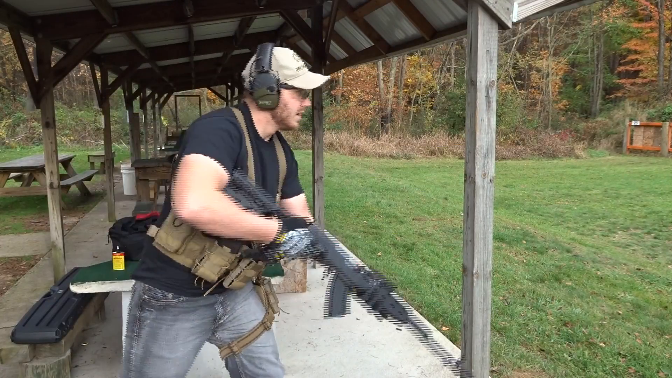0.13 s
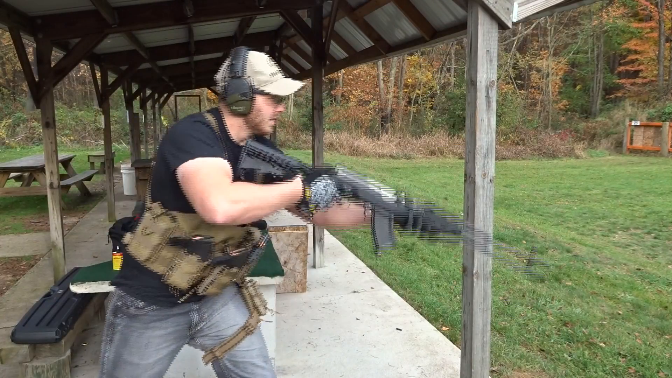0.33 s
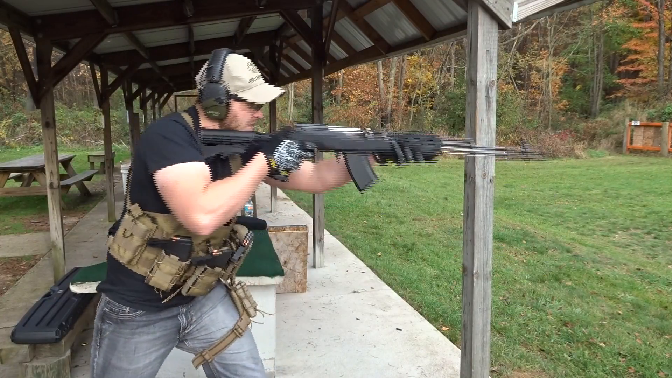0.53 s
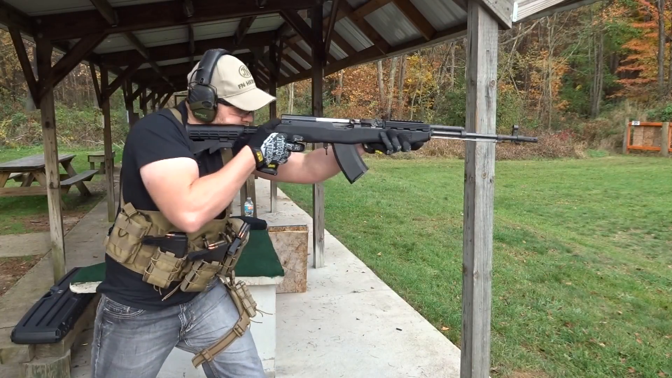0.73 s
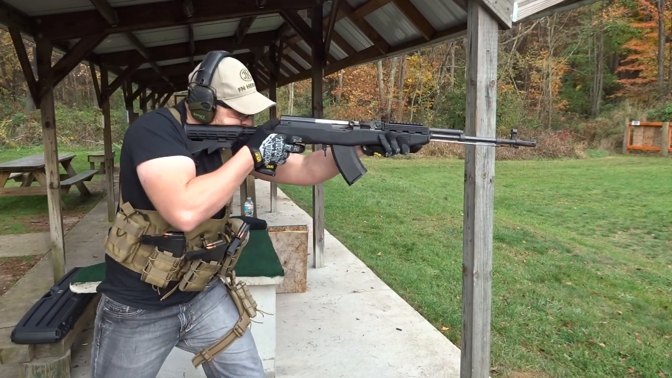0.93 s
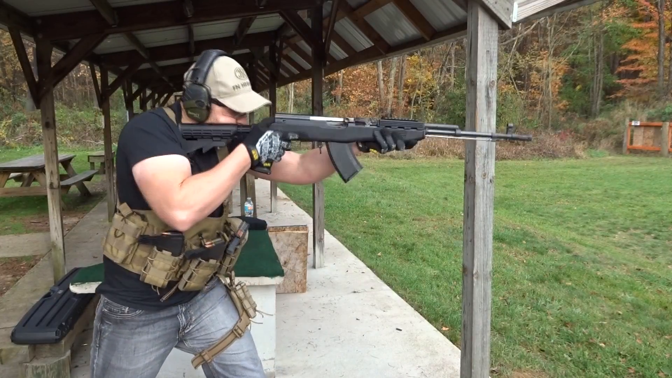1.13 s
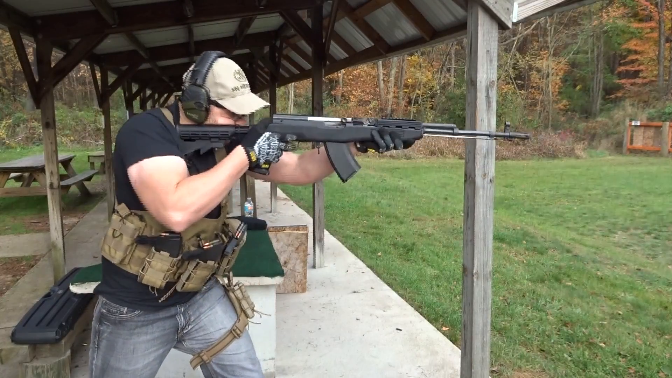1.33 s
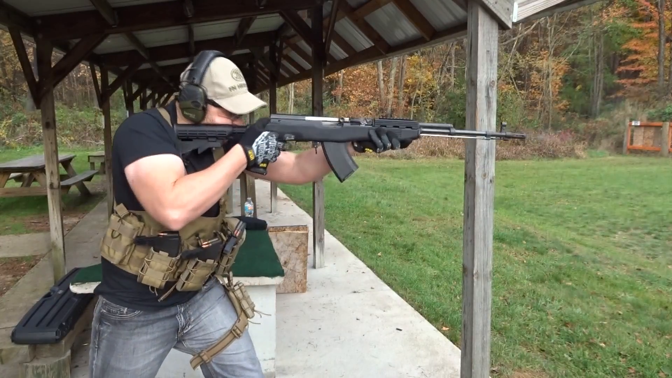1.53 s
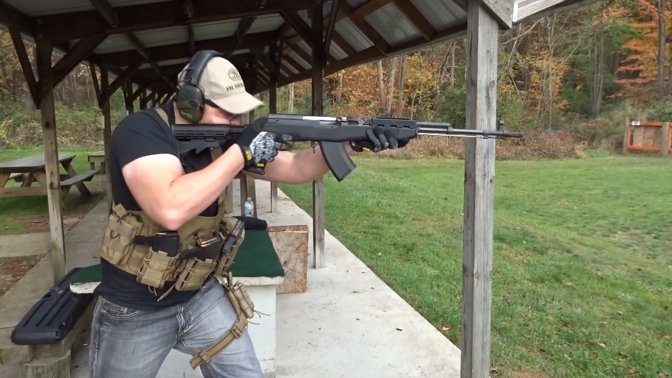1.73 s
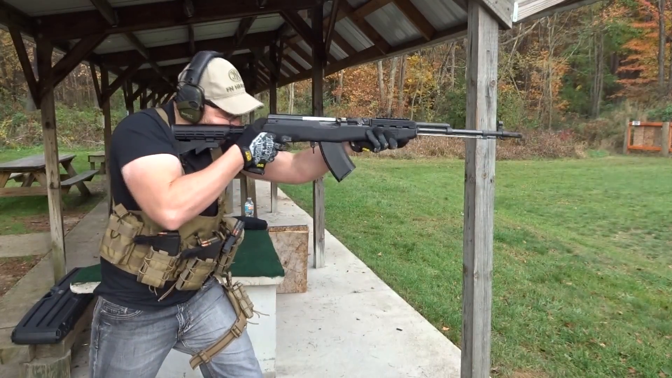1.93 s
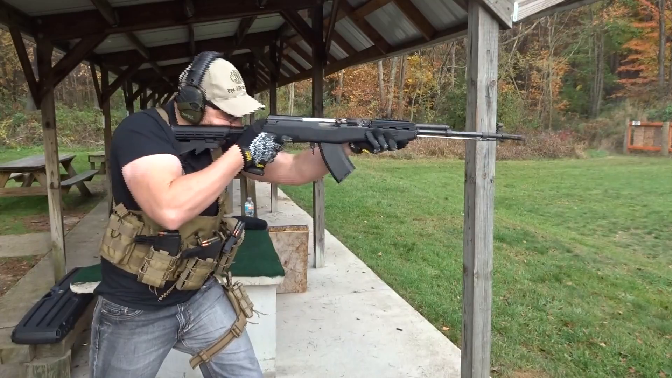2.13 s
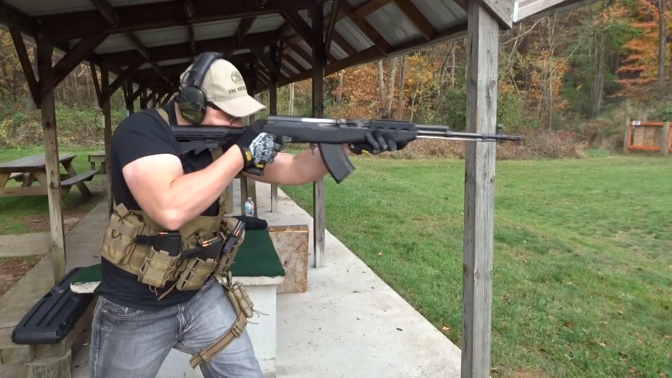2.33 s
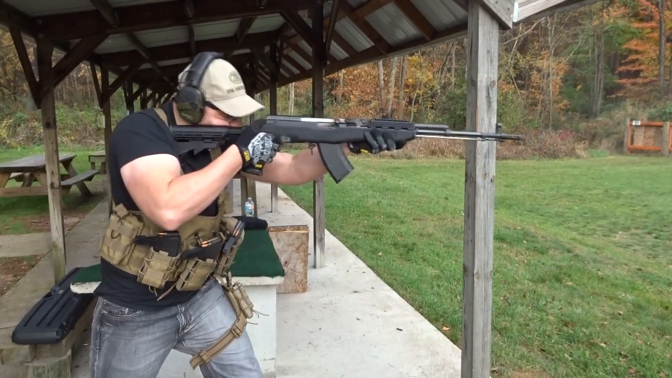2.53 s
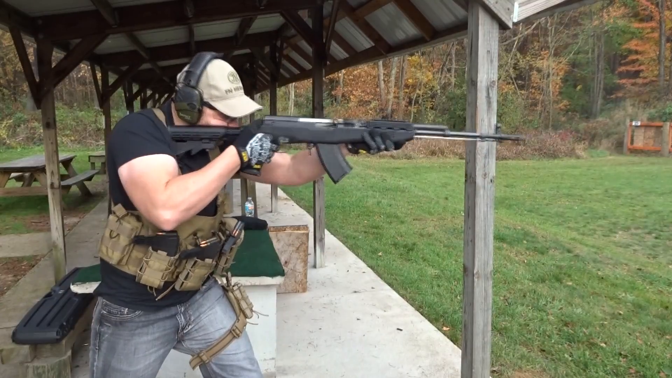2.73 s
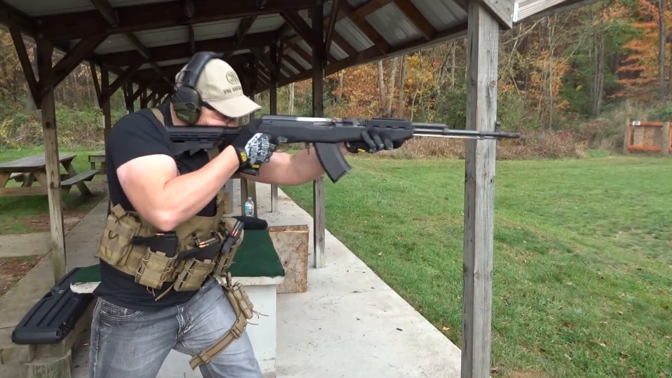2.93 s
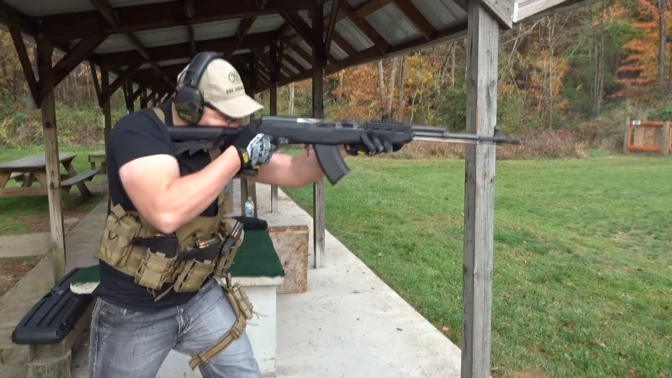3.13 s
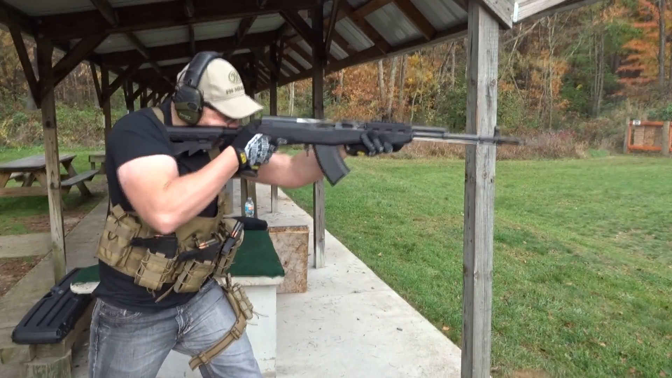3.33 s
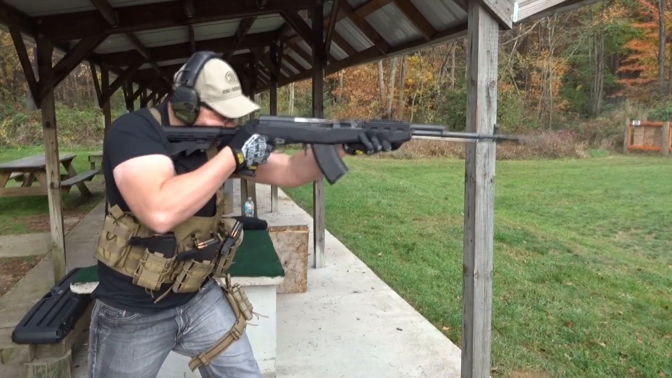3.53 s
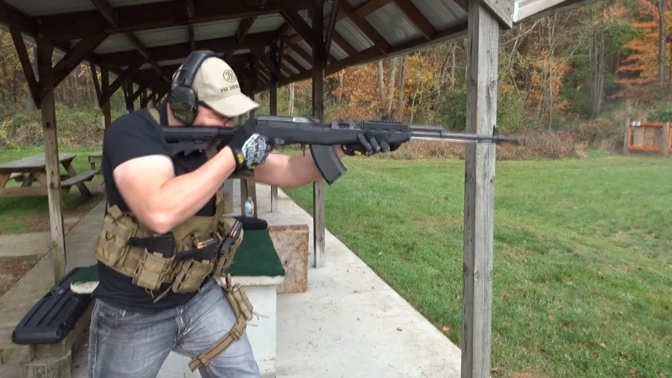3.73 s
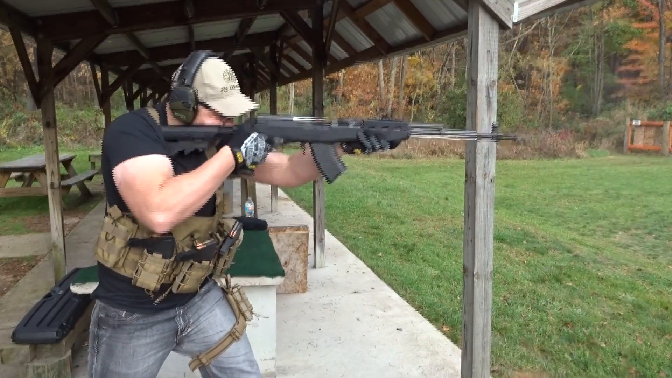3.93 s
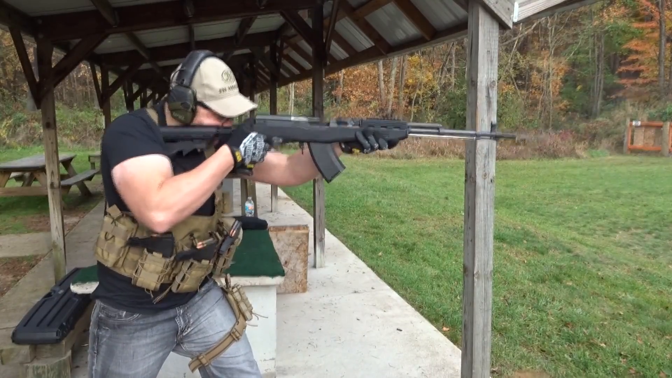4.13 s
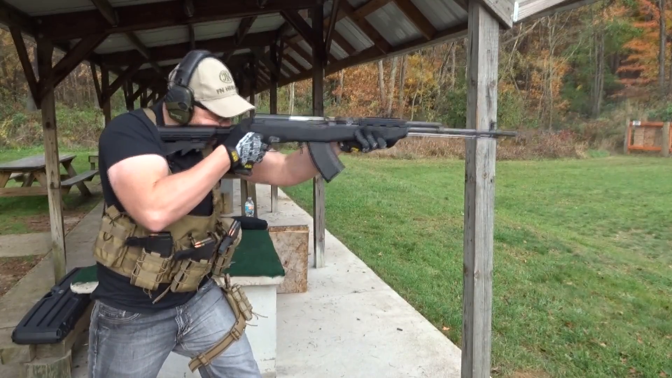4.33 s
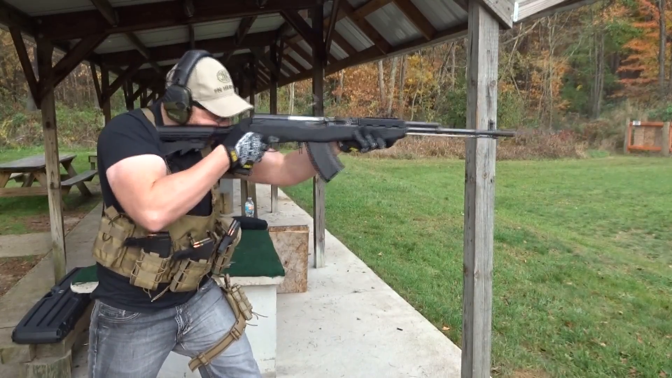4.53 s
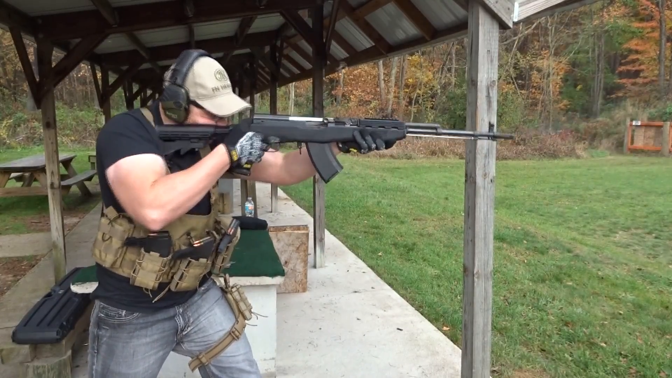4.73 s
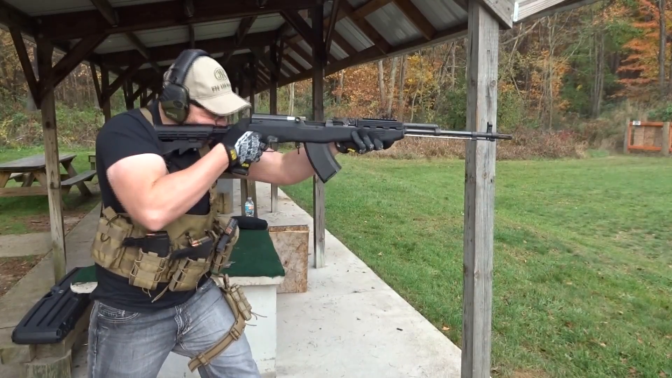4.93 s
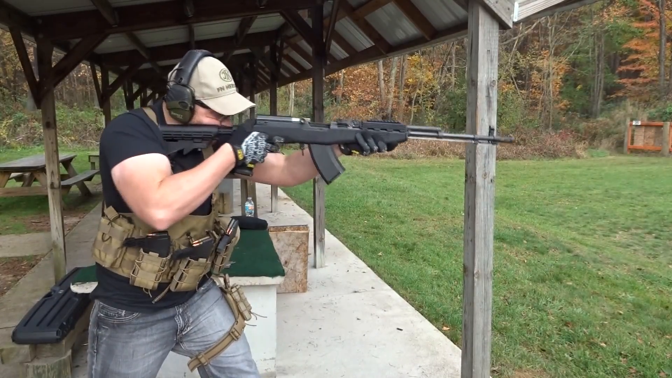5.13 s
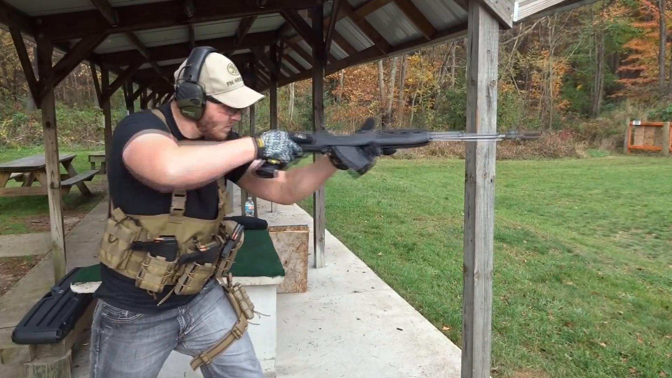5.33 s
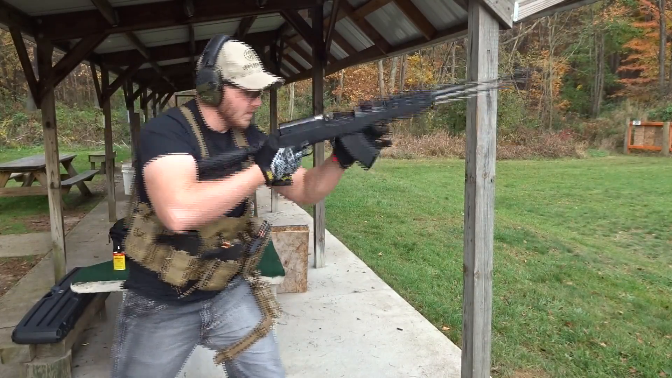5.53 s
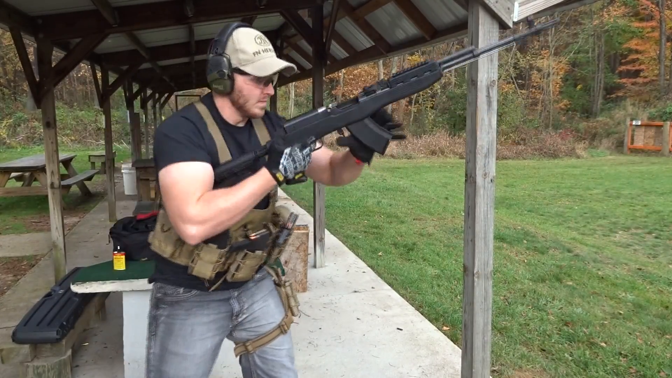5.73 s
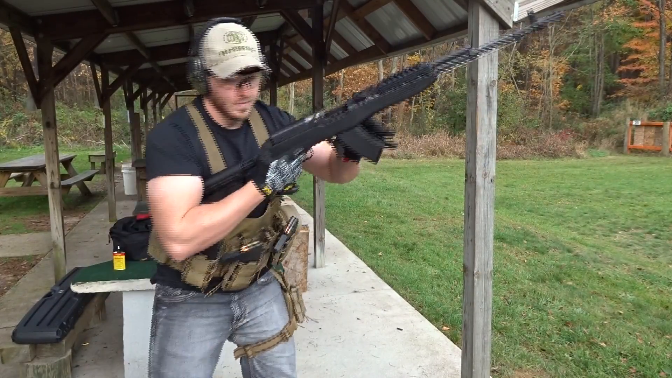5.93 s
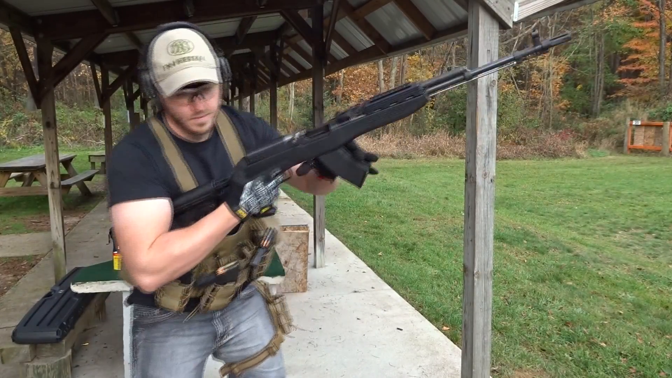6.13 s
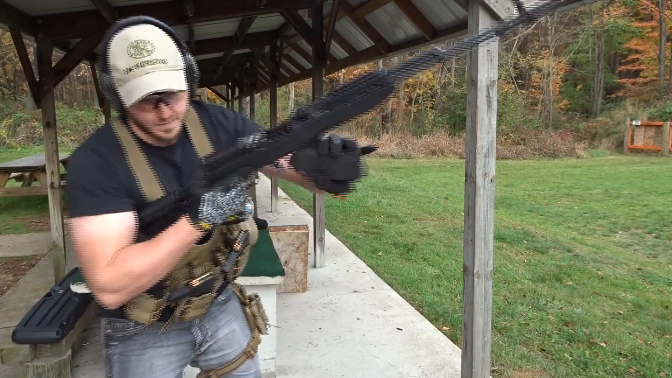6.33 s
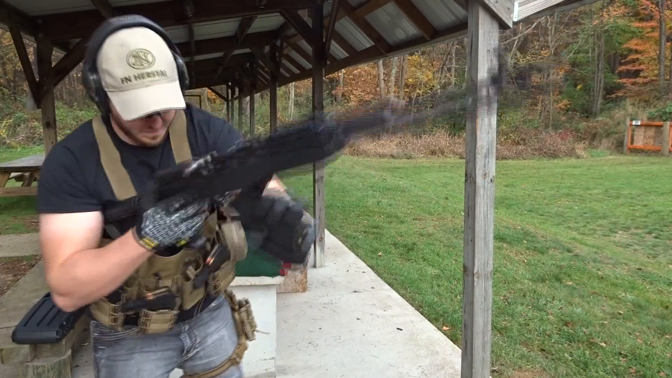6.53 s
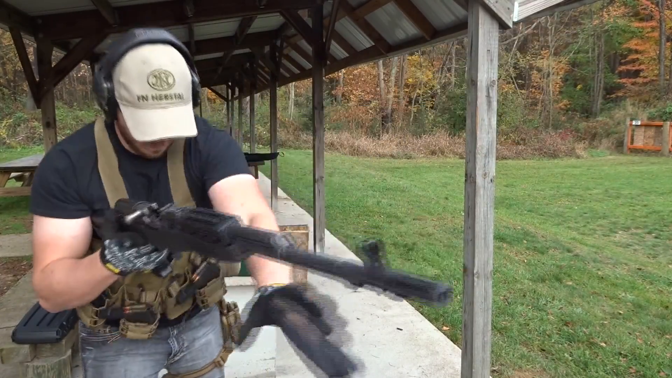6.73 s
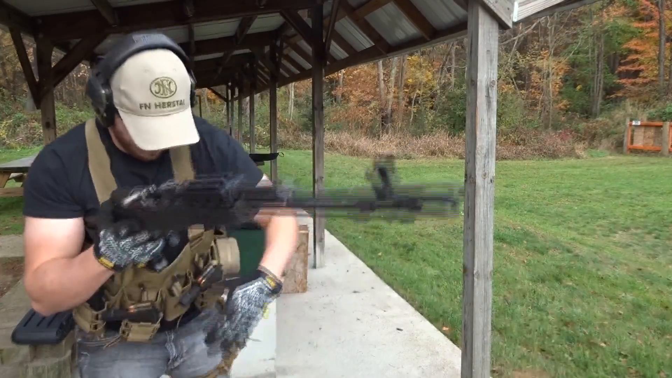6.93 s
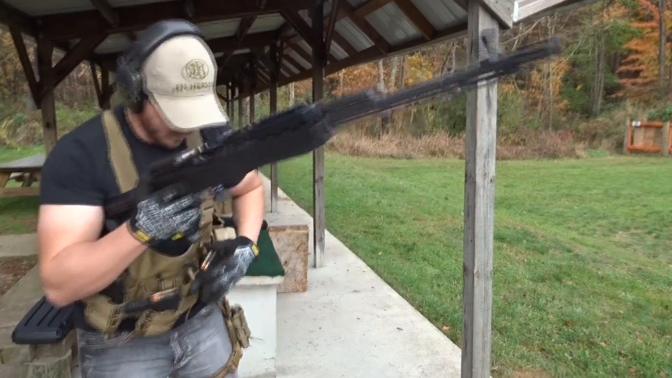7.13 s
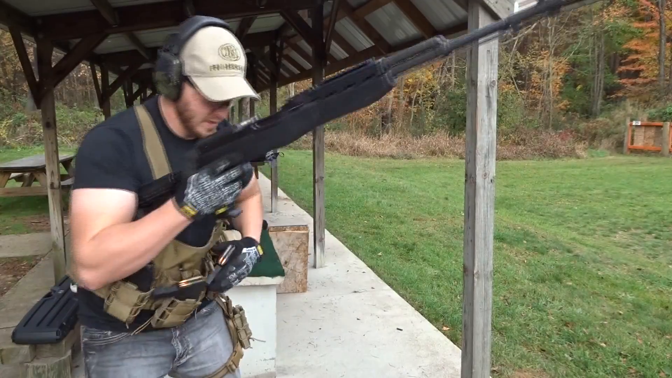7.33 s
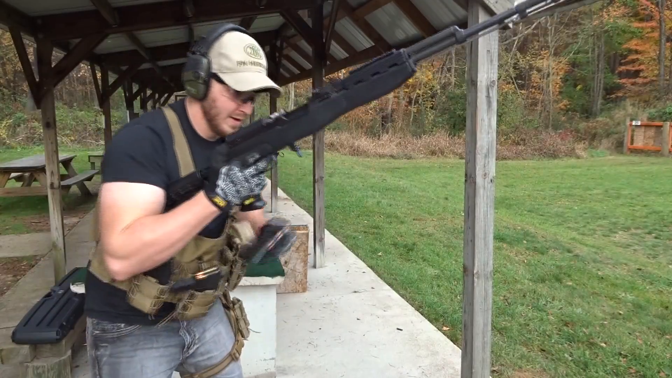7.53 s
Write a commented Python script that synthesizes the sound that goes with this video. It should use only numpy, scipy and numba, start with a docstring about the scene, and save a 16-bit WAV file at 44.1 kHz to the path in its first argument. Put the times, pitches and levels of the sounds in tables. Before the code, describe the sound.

Twenty quick rifle shots crack and boom under an open shelter, echoes roll off through woods and valley, then a magazine knocks out with metallic rattles.

```python
"""Under a long open shelter with a sheet roof, a rifle fires twenty quick shots; woods and a far valley answer.
Shots and echoes are shaped noise, with sine notes for the roof. Before them, sling and safety click in light wind;
after them, empty cases tinkle and the magazine knocks out of its well: noise puffs, thuds and fading sines.
The blasts overload the microphone and drive its automatic gain down; the slow part of the gain never climbs back."""
import sys
import numpy as np
from scipy import signal
from scipy.fft import rfft, irfft, next_fast_len
from scipy.io import wavfile
from scipy.ndimage import uniform_filter1d
from numba import njit

SR = 44100
rng = np.random.default_rng(int(sys.argv[2]) if len(sys.argv) > 2 else 0)


def amplitude_ratio(level_db):
    """Convert a level in decibels to the matching linear amplitude (field) ratio."""
    exponent = np.asarray(level_db, float) / 20
    return 10 ** exponent


def bounce(signal):
    """Save signal as a 16-bit WAV file at the path given by the first command-line argument."""
    frames = np.transpose(np.atleast_2d(signal))
    limited = np.clip(frames, -1, 1)
    pcm = np.round(limited * 32767).astype(np.int16)
    wavfile.write(sys.argv[1], SR, pcm)


N = 339129  # length in samples


def unit(x):
    """Scale a sound to rms 1."""
    return x / np.sqrt(np.mean(x ** 2) + 1e-20)


def along(points, hz):
    """Read rows of (Hz, value, ..) at the frequencies hz, joining them with lines on a log axis."""
    f, *columns = np.transpose(points)
    return np.squeeze([np.interp(np.log(hz + 1), np.log(f + 1), column) for column in columns])


def stereo(z, hz, alike):
    """Blend two unrelated spectrograms into left and right with the given likeness."""
    angle = np.arccos(np.clip(along(alike, hz), -1, 1))[:, None] / 2
    mid = z[0] * np.cos(angle)
    side = z[1] * np.sin(angle)
    return signal.istft(np.array([mid + side, mid - side]), nperseg=2 * len(hz) - 2)[1]


def patches(shape, db):
    """Random gain in soft patches over frequency and time, straying by db."""
    field = uniform_filter1d(rng.standard_normal(shape), size=8, axis=0)
    field = uniform_filter1d(field, size=6, axis=1)
    return amplitude_ratio(db * unit(field))


def band_noise(size, hz, octaves):
    """Noise of rms 1, strongest around hz and weaker away from it."""
    f = np.fft.rfftfreq(size, 1 / SR) + 1
    hump = 1 / (1 + (np.log2(f / hz) / octaves) ** 2) ** 1.25
    return unit(irfft(rfft(rng.standard_normal(size)) * hump, size))


def add(track, s, sound):
    """Mix a sound into the track from second s."""
    start = round(s * SR)
    track[..., max(start, 0):start + sound.shape[-1]] += sound[..., max(-start, 0):]


# Firing times, in seconds. The echoes below start from them too.
SHOT_TIMES = [(0.9149), (1.1455), (1.345), (1.54), (1.7377), (1.9506), (2.1603), (2.3583), (2.5612),
              (2.7606), (2.987), (3.1862), (3.3783), (3.5923), (3.788), (3.9911), (4.1742), (4.3666),
              (4.5449), (4.7329)]
# Tone of the blast. Each row: frequency in Hz, relative level in dB.
BLAST_TONE = [(40, -17.5), (100, -1.5), (200, 0), (600, 4.5), (900, 0.5), (1300, -4), (3000, -8.5),
              (7000, -16), (13000, -19.5), (16500, -23)]
# Notes of the shelter. Each row: frequency in Hz, relative level in dB.
ROOF_NOTES = [(161.5, -23.5), (220.7, -20.5), (285.3, -20), (511.4, -16.5), (554.5, -35), (656.8, -28),
              (709, -29), (802.1, -19), (1416, -31.5), (1750, -31), (1949, -24.5), (2169, -25.5),
              (2358, -32.5), (2536, -31)]
# How the shelter answers. Each row: frequency in Hz, seconds to fade by 60 dB (on top of a fade shared by all),
# build-up time in seconds, share of the power that repeats from shot to shot (0 to 1).
SHELTER_ECHO = [(100, 0.9, 0.004, 0.98), (370.5, 0.42, 0.0095, 0.3), (700, 0.35, 0.0078, .8),
                (1580, 0.48, 0.0012, 0.2), (3050, 0.18, 0.0029, 0.4), (6000, 0.48, 0.0022, 0.2),
                (12000, 0.29, 0.0015, 0.04)]
# Likeness of left and right in all the echoes. Each row: frequency in Hz, likeness (1 is the same).
ECHO_LIKENESS = [(60, 0.99), (150, 1), (380, 1), (950, 0.91), (2380, 0.91), (5000, 0.82), (9000, 0.8),
                 (15000, 0.85)]


def shelter():
    """Blast under the roof: treble crack first, low boom builds up; low echoes repeat, treble is mostly new."""
    size = SR // 2
    out = np.zeros((2, N + SR))

    def noise_spectrogram():
        return signal.stft(rng.standard_normal((2, size)), SR, nperseg=128)

    hz, t, same = noise_spectrogram()
    t60, build_up, share = along(SHELTER_ECHO, hz)[:, :, None]
    late = np.clip(t - .055, 0, None)  # posts and rafters down the long roof keep answering at first
    shape = amplitude_ratio(-60 * late / t60 - 171 * t) * (1 - np.exp(-t / build_up)) ** 2
    tone = amplitude_ratio(along(BLAST_TONE, np.fft.rfftfreq(2 * size, 1 / SR)))
    age = np.clip(np.arange(size) / SR - .004, 0, None)  # the roof answers a little after the crack
    swell = amplitude_ratio(-60 * age / .22) * (1 - np.exp(-age / .004))
    # each note reaches one side a little earlier
    lean = 0.14 * rng.standard_normal((len(ROOF_NOTES), 1, 1)) * [[1], [-1]]
    for s in SHOT_TIMES:
        fresh = noise_spectrogram()[2]
        mixed = np.sqrt(share) * same + np.sqrt(1 - share) * fresh
        echoes = stereo(shape * mixed, hz, ECHO_LIKENESS)
        blast = irfft(rfft(echoes, 2 * size) * tone)[:, :size]
        blast[:, 0] = 0
        boom = 0
        for k, (f, db) in enumerate(ROOF_NOTES):
            level = (-1) ** k * amplitude_ratio(db + rng.normal(0, 2.1))  # every other note starts upside down
            boom = boom + level * np.sin(2 * np.pi * f * age + lean[k])
        add(out, s - .001, blast + swell * boom)
    return out[:, :N]


# Echo of the tree line. Each row: frequency in Hz, relative level in dB, seconds to fade by 60 dB.
WOODS_ECHO = [(49.7, -33, 2.3), (125.3, -3.5, 1.5), (288.4, 0.5, 1.23), (610, 2.5, 1.94), (1400, -6, 1.64),
              (2950, -6, 1.18), (6000, -13, 0.94), (9000, -13, 0.6), (12500, -21, 0.69),
              (16000, -27.5, 0.62)]
# Echo of the far valley. Each row: frequency in Hz, relative level in dB, seconds to fade by 60 dB.
VALLEY_ECHO = [(100, -45, 4), (250, -26, 2.2), (447, 1, 8), (650, 1, 9), (870, -4, 7), (1170, -22, 5.4),
               (1700, -26.5, 6.4), (3000, -34, 3.4), (6000, -56.5, 2)]


def far_echo(answer, rise):
    """Every shot adds noise power that swells for about rise seconds, then fades at its own speed per frequency."""
    hz, t, z = signal.stft(rng.standard_normal((2, N)), SR, nperseg=512)
    db, t60 = along(answer, hz)[:, :, None]
    power = 0
    for s in SHOT_TIMES:
        age = np.clip(t - s, 0, None)
        power = power + amplitude_ratio(-120 * age / t60) * (1 - np.exp(-age / rise)) ** 2
    echo = z * amplitude_ratio(db) * np.sqrt(power) * patches(power.shape, db=1.18)
    return stereo(echo, hz, ECHO_LIKENESS)[:, :N]


def click(db, hz):
    """A sharp metal contact: a bright noise puff with a quick snap, and a narrow ring."""
    t = np.arange(SR // 10) / SR
    fade = amplitude_ratio(-60 * t / .028) + 0.75 * amplitude_ratio(-60 * t / 0.004)  # body, then snap
    puff = fade * band_noise(len(t), hz, octaves=1.0)
    ring = 0.39 * amplitude_ratio(-60 * t / .04) * band_noise(len(t), hz, octaves=.06)
    return amplitude_ratio(db) * (puff + ring)


# Single small contacts: sling and safety, trigger and hammer, empty cases landing, then late clicks.
# Each row: start in seconds, level in dB, strongest frequency in Hz.
CLICK_ROWS = [(0.3934, -74.5, 3650), (0.469, -82, 5000), (0.5074, -85, 7500), (.631, -94, 5630),
              (0.87, -81, 4940), (.8789, -87, 9000), (0.8938, -77, 6000), (.9084, -57, 6860),
              (5.198, -54, 11500), (5.323, -68, 12000), (5.42, -70, 12000), (5.555, -74, 12500),
              (5.5997, -68, 9000), (5.6765, -69, 8500), (6.13, -79, 5000), (6.1564, -68, 7000),
              (6.4273, -70, 3600), (6.479, -64, 1900), (6.765, -39, 6000), (6.7925, -41.5, 6000),
              (6.9716, -74, 3770), (7.0175, -52, 7000), (7.4076, -58.5, 7200), (7.4265, -53.5, 11590),
              (7.437, -55, 9000), (7.578, -59, 7700)]
# Blows that leave loose parts rattling. Each row: start in seconds, level of the blow in dB,
# strongest frequency of the blow in Hz, seconds for the rattle to fade by 60 dB.
RATTLE_ROWS = [(6.1942, -47.5, 4500, 0.27), (6.7541, -50, 4000, 0.59), (6.8384, -58, 5500, .45),
               (7.0028, -46, 2470, .22), (7.5542, -49.5, 4000, .14)]
# Small steel parts and empty cases ringing on one note.
# Each row: start in seconds, level in dB, frequency in Hz, seconds to fade by 60 dB.
PING_ROWS = [(.3925, -70, 3570, .03), (1.203, -14, 12440, 0.099), (2.82, -22, 12600, 0.12),
             (5.555, -70, 12400, .12), (6.756, -50, 2350, 0.11), (6.79, -36.5, 1580, 0.045),
             (7.02, -56, 3500, .06)]


def metal():
    """Contacts are noise clicks; blows leave uneven fading ticks over a noise scrape; pings are fading sines."""
    out = np.zeros(N + SR)
    t = np.arange(SR // 4) / SR
    for s, db, hz in CLICK_ROWS:
        add(out, s, click(db, hz))
    for s, db, hz, t60 in RATTLE_ROWS:
        add(out, s, click(db, hz))
        scrape = amplitude_ratio(db - 15 - 60 * t / t60) * band_noise(len(t), hz, octaves=1.5)
        add(out, s, scrape)
        chance = rng.standard_normal((8, 3))  # eight ticks: gap, strength and pitch
        delays = np.cumsum(.016 * np.exp(.15 * chance[:, 0]))  # seconds after the blow
        for late, (_, strength, pitch) in zip(delays, chance):
            tick_db = db - 4 + 2.5 * strength - 60 * late / t60
            tick_hz = min(1.3 * hz * np.exp(.3 * pitch), 13000)
            add(out, s + late, click(tick_db, tick_hz))
    for s, db, hz, t60 in PING_ROWS:
        onset = 1 - np.exp(-t / 0.00082)
        add(out, s, amplitude_ratio(db - 60 * t / t60) * np.sin(2 * np.pi * hz * t) * onset)
    return out[:N]


# Magazine knocking on the stock.
# Each row: start in seconds, level in dB, starting frequency of the thud in Hz, seconds for the thud to fade by 60 dB.
KNOCK_ROWS = [(6.7536, -20.5, 560, 0.066), (6.7646, -18.5, 371, 0.049), (6.844, -25, 405, 0.056),
              (7.005, -20.5, 250, 0.017)]
# Notes of the hollow stock and magazine. Each row: frequency in Hz, level in dB beside the thud,
# seconds to fade by 60 dB.
STOCK_NOTES = [(100, -18.5, 0.29), (158, -13.5, 0.14), (241, -9, 0.16), (720, -32, 0.045), (1116, -31, .07)]
# Cloth and webbing rubbing. Each row: middle in seconds, length in seconds, level in dB, strongest frequency in Hz.
RUSTLE_ROWS = [(0, 0.23, -86, 4970), (0.126, .12, -84, 2760), (0.341, 0.34, -91, 4470),
               (6.348, .5, -82, 4000), (7.12, .3, -67.5, 2860), (7.385, .2, -70.5, 6860),
               (7.453, .6, -76.5, 2500)]


def handling():
    """Knocks are a thud sagging in pitch, a noise puff and the stock's notes; rustle is a swell of grainy noise."""
    out = np.zeros(N + SR)
    t = np.arange(SR // 4) / SR
    for s, db, hz, t60 in KNOCK_ROWS:
        thud = np.sin(2 * np.pi * hz * t * (1 - 2.3 * t)) * amplitude_ratio(-60 * t / t60)
        puff = 0.17 * amplitude_ratio(-60 * t / 0.17) * band_noise(len(t), 330, octaves=1.08)
        notes = 0
        for f, level, life in STOCK_NOTES:
            fade = amplitude_ratio(level + rng.normal(0, 1.7) - 60 * t / life)
            notes = notes + fade * np.sin(2 * np.pi * f * t)
        add(out, s, amplitude_ratio(db) * (thud + notes + puff) * (1 - np.exp(-t / 0.001)))
    for s, length, db, hz in RUSTLE_ROWS:
        size = 2 * round(length * SR / 2)
        grain = amplitude_ratio(2.8 * unit(uniform_filter1d(rng.standard_normal(size), size=120)))
        rub = np.hanning(size) * grain * band_noise(size, hz, octaves=1.2)
        add(out, s - length / 2, amplitude_ratio(db) * rub)
    return out[:N]


def nearby(x):
    """Add short reflections off posts and floor: a fading noise tail, different on each side."""
    t = np.arange(SR // 10) / SR
    tail = rng.standard_normal((2, len(t))) * amplitude_ratio(-60 * t / .09)
    tail = tail / np.linalg.norm(tail[0])
    return x + amplitude_ratio(-13.0) * signal.fftconvolve(x[None], tail, axes=1)[:, :N]


# Tone of wind and distant hum. Each row: frequency in Hz, relative level in dB.
AIR_TONE = [(15, -32.5), (25, 4), (149, -4.5), (641, -8.5), (714, -8), (936, -11.5), (1300, -26.5),
            (1740, -24.5), (2160, -34), (2550, -38), (14000, -43.5), (16000, -47.5)]
# Likeness of left and right in the wind. Each row: frequency in Hz, likeness (1 is the same).
AIR_LIKENESS = [(60, 0.99), (180, 0.93), (550, 0.8), (1650, 0.46), (4970, 0.23), (15000, 1)]


def air():
    """Light wind and far hum: steady shaped noise with slight random patches, at rms 1."""
    hz, t, z = signal.stft(rng.standard_normal((2, N)), SR, nperseg=1024)
    tone = amplitude_ratio(along(AIR_TONE, hz)[:, None])
    return unit(stereo(z * tone * patches(z.shape[1:], db=0.4), hz, AIR_LIKENESS)[:, :N])


def scene():
    """Shots with near and far echoes, handling close by, and wind."""
    shots = amplitude_ratio(12.0) * shelter()
    woods = amplitude_ratio(-5) * far_echo(WOODS_ECHO, rise=0.026)
    valley = amplitude_ratio(-27.5) * far_echo(VALLEY_ECHO, rise=0.26)
    close = nearby(handling() + metal())
    return shots + woods + valley + close + amplitude_ratio(-74) * air()


def clipped(x, top, hard):
    """Rounded clipping at +-top; the louder side sets the squeeze for both."""
    return x / (1 + (np.abs(x).max(axis=0) / top) ** hard) ** (1 / hard)


@njit
def gain_control(level_db):
    """A fast limiter overdoes deep cuts; while it works, a slow gain sinks for good, down to a lowest gain."""
    start_db, lowest_db, top_db = 29.5, -3.0, -13.5  # first gain, lowest gain, level the limiter aims for
    attack_s, release_s, sink_s = .0004, 0.014, 0.45
    overshoot = .005  # extra cut per squared dB of cut
    gain_db, slow, fast = np.empty_like(level_db), start_db, 0.0
    for i in range(len(level_db)):
        need = min(0.0, top_db - level_db[i] - slow)
        seconds = attack_s if need < fast else release_s
        fast += (need - fast) / (seconds * SR)
        slow = max(lowest_db, slow + fast / (sink_s * SR))
        gain_db[i] = max(lowest_db, slow + fast - overshoot * fast ** 2)
    return gain_db


# Stereo width of the microphone pair, played by record(). Each row: frequency in Hz,
# gain in dB on the left-minus-right signal.
STEREO_WIDTH = [(60, 1), (300, 2.5), (700, 0), (2500, 0.5), (7000, -4.5), (13000, -8)]


def roll_off(x):
    """The treble ends steeply here."""
    return signal.sosfilt(signal.butter(12, 16630, fs=SR, output="sos"), x)


def record(dry):
    """The microphone overloads, filling blasts with treble; then come automatic gain, filters, width and clipping."""
    heard = clipped(dry, 0.7, 1.58)
    power = np.abs(uniform_filter1d(np.mean(heard ** 2, axis=0), size=128))  # abs guards against rounding
    level_db = 10 * np.log10(power + 1e-12)
    coming_db = np.maximum(level_db, np.roll(level_db, -round(0.0022 * SR)))  # looks ahead 2.2 ms
    gain_db = gain_control(coming_db)
    size = next_fast_len(N + SR)
    jf = 1j * np.fft.rfftfreq(size, 1 / SR)
    low_cut = (jf / (jf + 45)) ** 2
    treble_lift = (1 + jf / 2500) / (1 + jf / 5000)
    phase_turn = (700 - jf) / (700 + jf)  # makes flat tops spiky
    band_limit = 1 / (1 + (jf.imag / 15500) ** 110)
    left, right = rfft(heard * amplitude_ratio(gain_db), size) * low_cut * treble_lift * phase_turn * band_limit
    mid = (left + right) / 2
    side = (left - right) / 2 * amplitude_ratio(along(STEREO_WIDTH, jf.imag))
    mix = irfft([mid + side, mid - side], size)[:, :N]
    finished = clipped(mix, 1, 5.4)
    return roll_off(finished)


dry = scene()
out = record(dry)
bounce(out)
```